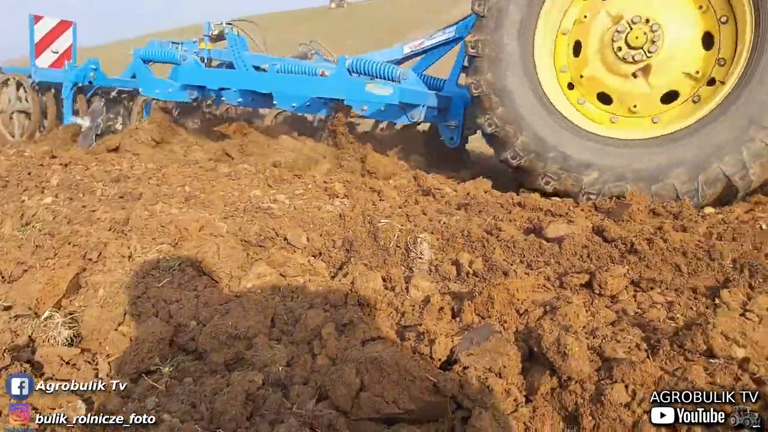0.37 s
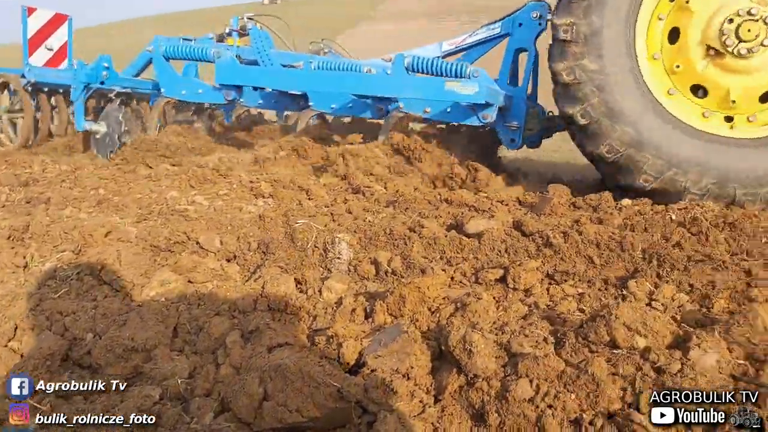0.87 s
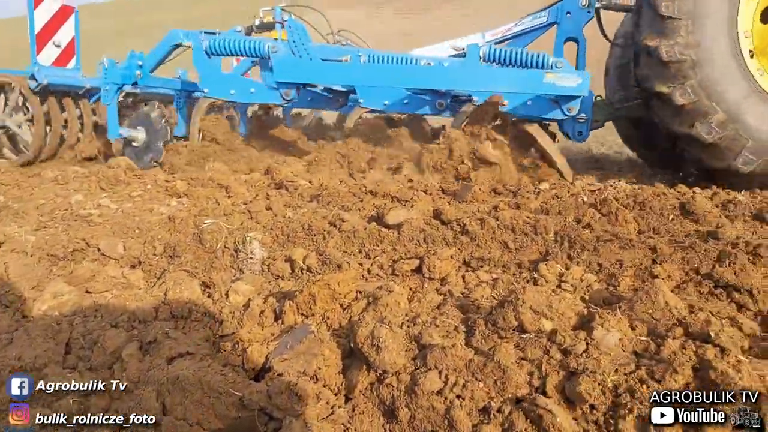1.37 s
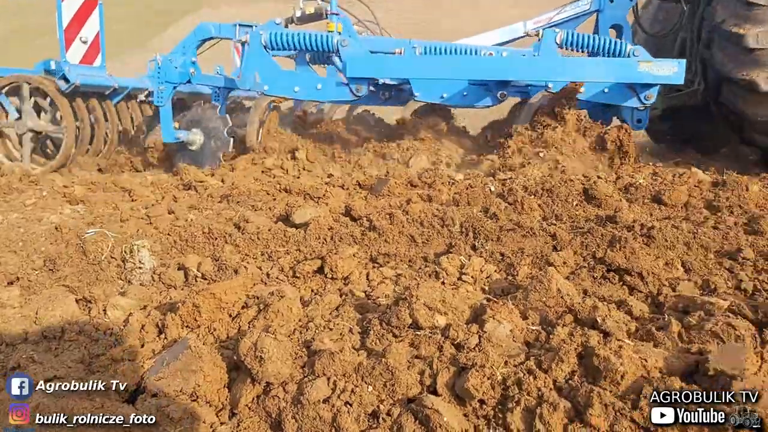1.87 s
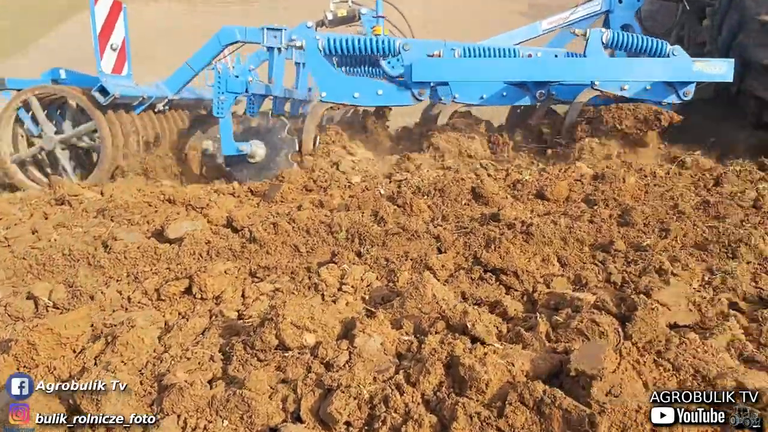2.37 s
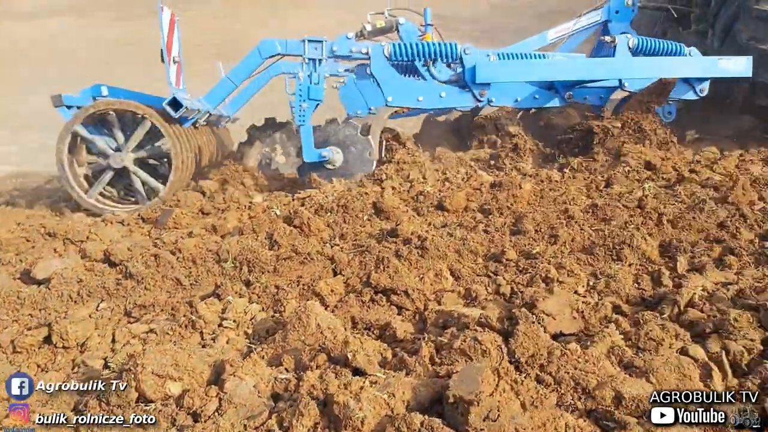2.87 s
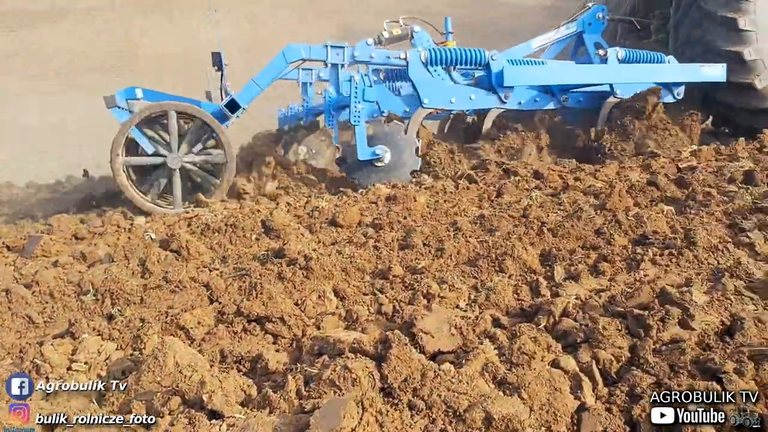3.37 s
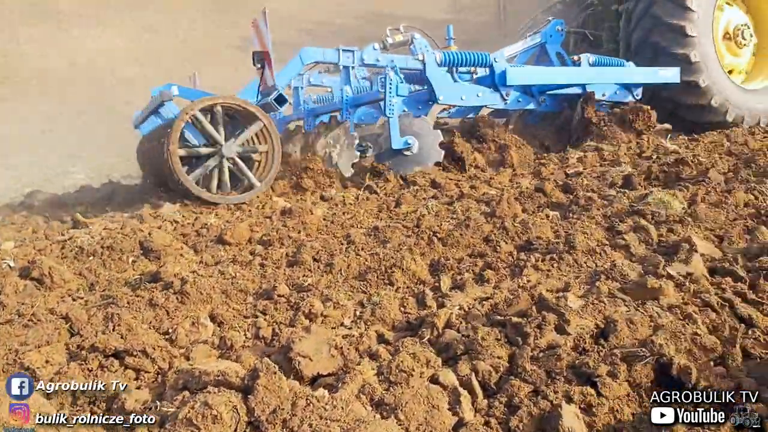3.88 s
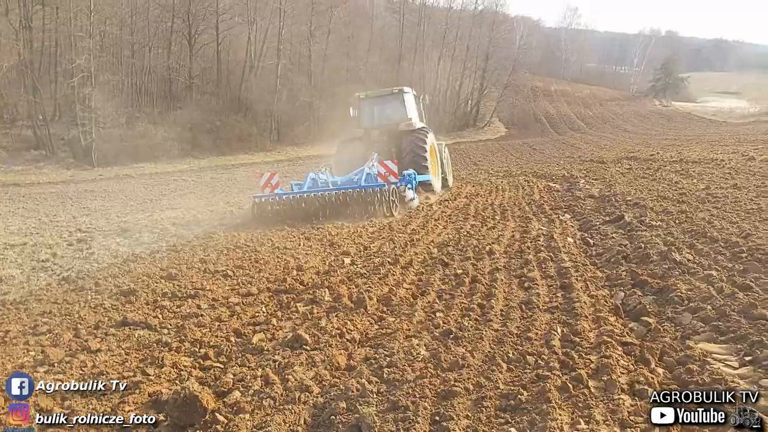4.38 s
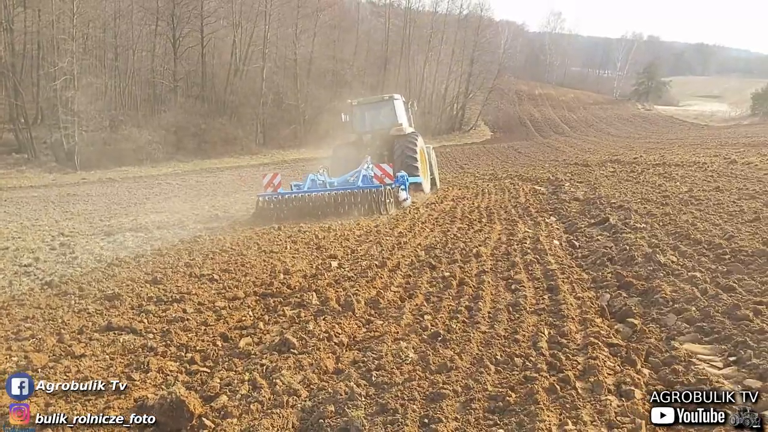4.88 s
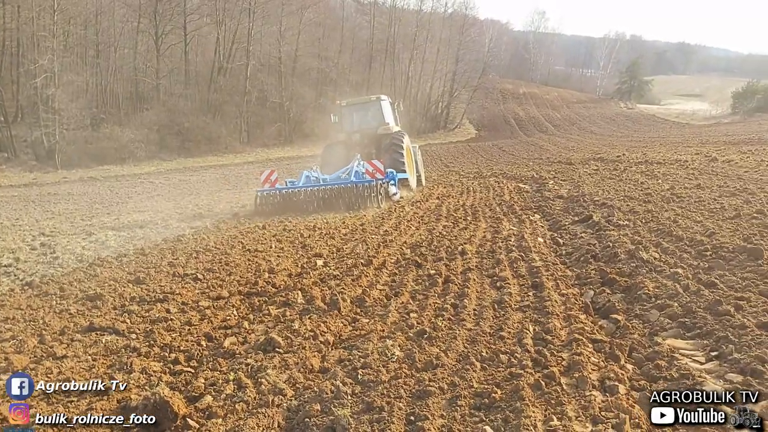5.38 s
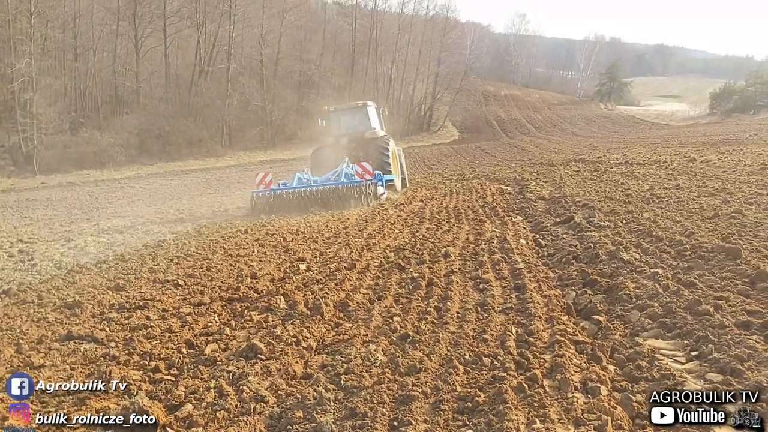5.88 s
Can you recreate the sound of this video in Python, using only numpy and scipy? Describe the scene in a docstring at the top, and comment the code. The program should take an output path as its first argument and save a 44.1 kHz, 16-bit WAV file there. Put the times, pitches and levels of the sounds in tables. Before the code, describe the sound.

A heavy diesel tractor drones close by, dragging tines through crumbling soil with stony clanks, then cuts briefly silent and continues quieter from behind.

```python
"""Tractor cultivating a field

A six-cylinder diesel tractor drags a tined cultivator past a two-port microphone on an open field, heard from close
beside the furrow, then, after a brief silence, from well behind. Exhaust orders and fan tones are phase-locked sines;
gear whine and intake whirr are sines modulated by noise; block, air and breaking soil are filtered noise.
Stones clank and loose parts rattle by exciting damped modes of the steel tines."""
import sys
import numpy as np
from scipy import signal
from scipy.fft import rfft, irfft, next_fast_len
from scipy.io import wavfile
from scipy.ndimage import uniform_filter1d, map_coordinates

SR = 44100
rng = np.random.default_rng(int(sys.argv[2]) if len(sys.argv) > 2 else 0)


def boost_factor(decibels):
    """Convert a level in decibels to a linear amplitude factor."""
    exponent = np.asarray(decibels, float) / 20
    return 10 ** exponent


def store_wav(level_fs):
    """Save 16-bit WAV to argv[1]."""
    pcm = np.round(np.clip(np.atleast_2d(level_fs), -1, 1) * 32767)
    wavfile.write(sys.argv[1], SR, pcm.T.astype(np.int16))


N = 264600
PAD = next_fast_len(N + 4096)
HZ = np.maximum(np.fft.rfftfreq(PAD, 1 / SR), 1)

# Stances count 0 beside, 1 passing, 2 leaving, 3 behind.
# tractor position: (time [s], stance [0-3])
STANCE = [(0, 0), (.4, 0), (1.8, 1), (2.4, 1), (3.6, 2), (4.15, 2), (4.3, 3), (6, 3)]
# the pass: (time [s], roar gain [dB], lag of the left port [ms])
PASS = [(0, 1, 0.36), (.6, 1, 0.38), (1.3, 2, 0.39), (1.9, 3, .4), (2.4, 1, 0.39), (2.9, 2, 0.37),
        (3.3, 1.5, .33), (4.15, 2.5, .27), (4.3, 1.5, 0.044), (5, 0.5, 0), (6, 0, 0)]
# silent gap: (start [s], end [s])
GAP_S = (4.1278, 4.3185)
# engine under load: (time [s], mean firing rate [Hz], mean rms level of the firing tone [dB])
ENGINE = [(0, 103.3, -17), (.3, 103, -15.5), (1.2, 102.5, -17), (1.7, 102.5, -18), (2.4, 101.6, -16.5),
          (2.9, 101.5, -18), (3.2, 100.1, -17.5), (4.15, 100.5, -18), (4.3, 103.1, -23.5),
          (4.9, 102.6, -24), (5.4, 103.9, -23.5), (5.7, 102.9, -23), (5.79, 102.9, -25),
          (5.9, 104.9, -23.5), (6, 100, -25)]
# exhaust overtones: (multiple of the firing rate, mean levels re firing tone at the four stances [dB])
OVERTONES = [(1.5, (-12.5, -12, -14, -12)), (2, (-23, -16, -14, -11))]
# belt-driven cooling fan: (multiple of the fan's turning rate, mean rms levels at the four stances [dB])
FAN = [(3, (-46.5, -37.5, -47.5, -36)), (4, (-39, -42, -35, -45.5)), (6, (-38.5, -38, -42.5, -46)),
       (9, (-41.5, -40.5, -43.5, -40))]
FAN_PER_FIRING = .715   # fan turns per firing
HALF_ORDER_DB = -48.5   # mean rms level at half the firing rate
HUM_LEFT_DB = -0.8      # exhaust and fan at the left port re the right
# gear whines: (multiple of the firing rate, nominal level [dB])
GEARS = [(19, -46), (38, -49), (51.5, -52)]
# intake whirr: (time [s], centre frequency [Hz], nominal level [dB])
WHIRR = [(0, 2200, -43), (.6, 2150, -38.5), (1.1, 2120, -35), (1.6, 2020, -36), (2.1, 2000, -36),
         (2.6, 2050, -45), (3.1, 2120, -49), (3.6, 2100, -56), (6, 2100, -60)]
# roar spectrum at each of four stances: (frequency [Hz], nominal density [dB per Hz])
ROAR = ([(25, -63.5), (35, -66), (55, -60.5), (80, -48), (130, -43), (200, -48.5), (400, -58.5), (800, -53),
        (1600, -58.5), (3200, -70), (6400, -69.5), (9500, -79)], [(25, -67.5), (35, -67), (55, -56),
        (100, -51.5), (200, -51.5), (400, -59.5), (800, -61), (1600, -56.5), (3200, -61.5), (6400, -80.5),
        (9500, -73.5)], [(25, -86), (35, -67), (55, -60), (100, -47.5), (200, -53), (400, -59),
        (800, -64.5), (1600, -64), (3200, -74), (6400, -80.5), (9500, -81.5)], [(25, -89), (35, -61),
        (55, -59), (100, -49), (200, -57), (400, -55.5), (800, -64.5), (1600, -66.5), (3200, -70),
        (6400, -76), (9500, -90)])
# peaks and dips from bodywork and ground echo at each stance: (frequency [Hz], width [Hz], gain [dB])
RIPPLE = ([(341, 63, 7.5), (1190, 210, -2.5), (1488, 59, 8), (2162, 220, 8), (2950, 520, 5.5),
          (3950, 590, 5.5), (4970, 420, 6), (6900, 280, -0.5), (7600, 490, 0), (8800, 220, 4.5)],
          [(780, 67, -0.5), (1270, 86, -9.5), (1692, 310, -9.5), (2575, 490, -9.5), (3280, 570, -12.5),
          (3620, 130, -8), (5140, 380, 4), (6320, 470, 9.5), (6900, 450, -3), (7560, 370, 4.5),
          (9140, 2100, -7)], [(1150, 270, -5.5), (1930, 270, -5), (2600, 140, 0.5), (3870, 54, 11),
          (4270, 700, -0.8), (5320, 350, 2.5), (5910, 630, 6), (6520, 390, 3.5)], [(372, 84, -8),
          (705, 350, 5), (2050, 130, -6), (2554, 140, -9.5), (2650, 200, 5.5), (3415, 120, -9),
          (3990, 330, -5.5), (6000, 230, 3.5), (6850, 810, -1)])
# left port re right, for sound from the side, turning and from ahead:
# (frequency [Hz], level [dB], likeness [0-1], phase lead [rad])
PORT_SIDE = [(60, -3.4, 0.96, 0.2), (300, -5.3, 0.98, 0.2), (520, -4.2, 0.97, 0.3), (1200, 1.1, 0.93, 0.3),
             (1500, -3.1, 0.9, 0.3), (1870, 0.8, 0.74, 0.1), (2300, -10.4, 0.45, 0.4),
             (2700, -3.8, 0.25, -0.6), (3200, -2.8, 0.31, -1.0), (4500, -2.0, 0.48, -0.0),
             (5500, -1.7, 0.44, -0.0), (6200, -8.3, 0.24, 0.3), (7400, 3.0, 0.68, 0.6),
             (8900, -14.3, 0.12, 1.0), (9500, -11.7, 0.25, 0.9)]
PORT_TURNING = [(60, -3.1, 0.96, 0.2), (300, -5.3, 0.99, 0.2), (700, -1.9, 0.97, 0.6),
                (1100, 3.2, 0.84, 0.5), (1450, -3.1, 0.91, 0.5), (1800, -2.6, 0.75, 0.9),
                (2150, -5.6, 0.35, 0.9), (3000, 0.3, 0.14, 1.0), (3750, -1.6, 0.18, 0.3),
                (4800, 4.5, 0.3, -0.1), (5500, -3.7, 0.61, -0.3), (5800, -9.6, 0.28, -0.1),
                (7300, 1.4, 0.54, 1.0), (8600, -15.7, 0.12, 1.0), (9500, -16.3, 0.35, 0.8)]
PORT_AHEAD = [(60, -4.0, 0.98, 0.1), (300, -6.6, 0.98, 0.0), (600, -1.9, 0.99, -0.0),
              (1200, -0.1, 0.95, -0.2), (1900, -5.8, 0.86, -0.4), (2350, -11.8, 0.4, -1.0),
              (2600, -5.7, 0.72, -0.3), (2850, -9.8, 0.75, 0.5), (3600, 1.3, 0.72, 0.5),
              (4200, 3.6, 0.79, -0.4), (4700, -3.2, 0.74, -0.9), (5900, -6.6, 0.78, 0.1),
              (6700, 0.2, 0.62, 0.4), (7600, -0.7, 0.55, 0.4), (8500, -5.3, 0.36, 0.5),
              (9500, -3.9, 0.23, -0.7)]
# stones on tines: (time [s], nominal strike level [dB], brightest frequency [Hz], scrape decay constant [ms])
CLANKS = [(0.052, -26, 5300, 5.1), (0.31, -20, 6000, 3), (.445, -17.5, 6460, 2.4), (1.368, -22, 5530, 3),
          (2.223, -21, 6400, 3), (2.789, -13, 7600, 3), (2.82, -18.5, 6540, 3.5), (2.869, -13, 4350, 5.8),
          (2.88, -20, 3730, 6.3), (2.927, -21, 6900, 5.8), (2.953, -23, 7500, 3.3), (3.039, -23.5, 7487, 5),
          (3.065, -23.5, 7770, 7.5), (3.267, -20, 3820, 8.3), (3.707, -29, 3950, 4.4),
          (4.823, -26, 3500, 3), (4.888, -22, 3400, 3.4), (4.899, -30, 3006, 2), (5.011, -10, 4310, 1.4),
          (5.380, -28, 4400, 3.3), (5.543, -23.5, 6746, 3.9)]
# modes of the tine steel: (frequency [Hz], relative level [dB], 60 dB decay time [s])
TINE = [(2150, -2, .03), (2850, -1, .09), (3440, -5, .022), (3850, -3, .022), (4420, 2, .024),
        (5200, -2, .02), (5950, -3, .022), (6600, -3, .018), (7700, -2, .015), (8850, -6, .012),
        (9300, -6, .012)]
RATTLES_PER_S, RATTLE_DB = 40, -50   # median rate; least strength


def in_time(rows):
    """Linear interpolation: columns of a curve at every sample."""
    s, *columns = np.transpose(rows)
    return [np.interp(np.arange(N) / SR, s, c) for c in columns]


def at_hz(rows):
    """Interpolation on a logarithmic frequency axis: columns of a spectrum at every bin."""
    hz, *columns = np.transpose(rows)
    return [np.interp(np.log(HZ), np.log(hz), c) for c in columns]


def at_stance(levels_db, stance):
    """Linear interpolation of levels between successive stances."""
    return np.interp(stance, np.arange(len(levels_db)), levels_db)


def drift(pole_hz):
    """Low-pass random process: noise through two equal poles, scaled to unit spread."""
    r = np.exp(-80 * np.pi * pole_hz / SR)   # computed at every 40th sample
    noise = rng.standard_normal(N // 40 + 2002)
    slow = signal.lfilter([1], [1, -2 * r, r * r], noise)[2000:]   # without the filter's run-in
    return np.interp(np.arange(N) / 40, np.arange(len(slow)), slow / slow.std())


def engine():
    """Phase is the integral of frequency: returns the wavering firing phase and the firing level in dB."""
    firing_hz, first_db = uniform_filter1d(in_time(ENGINE), size=1500)
    phase = 2 * np.pi * np.cumsum(firing_hz * (1 + .004 * drift(8.2))) / SR
    return phase, first_db


def exhaust(phase, first_db, stance):
    """Harmonic synthesis: the pulsed exhaust sounds at fixed multiples of the firing rate."""
    out = boost_factor(first_db + 0.66 * drift(28)) * np.cos(phase)
    for order, under_db in OVERTONES:   # crests meet in a pointed puff
        level_db = first_db + at_stance(under_db, stance)
        out += boost_factor(level_db + 2.5 * drift(4.2)) * np.cos(order * phase)
    out += boost_factor(HALF_ORDER_DB + 2.2 * drift(3.6)) * np.sin(phase / 2)   # uneven banks
    return np.sqrt(2) * out   # rms to peak


def fan(phase, stance):
    """Rotational tones: a belt locks the fan's orders to the firing, with some wander of phase."""
    out = np.zeros(N)
    for order, fan_db in FAN:
        level_db = at_stance(fan_db, stance) + 1.6 * drift(1.5)
        angle = order * FAN_PER_FIRING * phase + .6 * drift(6)
        out += boost_factor(level_db + 1.5 * drift(9)) * np.sin(angle)
    return np.sqrt(2) * out   # rms to peak


def gears(phase):
    """Amplitude modulation: fluttering tooth load smears the tooth-mesh tones into narrow bands."""
    return sum(boost_factor(db) * drift(25) * np.sin(order * phase) for order, db in GEARS)


def churn(phase, shared_db, own_db, throb):
    """Band-wise modulation: two flat noises flicker alike and their treble throbs with each firing; spectra."""
    white, out = rfft(rng.standard_normal((2, N)), PAD), 0
    together = drift(26) + 0.46 * drift(1.8)
    for octave in np.arange(4, 15):   # overlapping bands centred on 2 ** octave Hz
        window = np.clip(1 - abs(np.log2(HZ) - octave), 0, 1)
        band = irfft(white * window, PAD)[:, :N]
        treble = min(max(octave - 8, 0) / 4, 1)
        flicker = boost_factor(treble * shared_db * together + own_db * drift(26))
        out = out + flicker * (1 + throb * treble * np.cos(phase)) * band
    return rfft(out * np.sqrt(SR / 2), PAD)   # to about unit power per Hz


def whirr():
    """Modulation by noise: fast flutter of size and sign spreads a tone some 250 Hz wide, in uneven grains."""
    centre_hz, level_db = in_time(WHIRR)
    flutter = drift(140) * boost_factor(2.0 * drift(25))
    return boost_factor(level_db) * flutter * np.sin(2 * np.pi * np.cumsum(centre_hz) / SR)


def tines():
    """Modal synthesis: stones and rattling loose parts strike damped resonances of the tine steel."""
    out = np.zeros(N)
    chances_db = rng.normal(0, 1.5, (len(CLANKS), len(TINE)))
    loose = rng.random(N) < RATTLES_PER_S * boost_factor(4.0 * drift(5)) / SR
    sizes = boost_factor(RATTLE_DB + 3.5 * np.minimum(rng.exponential(1, N), 4))
    struck_mode = rng.integers(0, len(TINE) - 2, N)
    for k, (hz, mode_db, t60) in enumerate(TINE):
        force = loose * sizes * (abs(struck_mode - k) < 2) + 1e-18   # a rattle also excites adjoining modes
        for (s, strike_db, bright_hz, _), chance_db in zip(CLANKS, chances_db[:, k]):
            away_db = -13 * np.log2(hz / bright_hz) ** 2
            # the contact spreads through the steel: modes start up to 3.5 ms apart
            start = round((s + .0035 * rng.random()) * SR)
            force[start] += boost_factor(strike_db + away_db + chance_db - 8)
        r, w = boost_factor(-60 / (t60 * SR)), 2 * np.pi * hz / SR
        out += boost_factor(mode_db) * signal.lfilter([0, np.sin(w)], [1, -2 * r * np.cos(w), r * r], force)
    return out


def scrapes():
    """Friction noise: each stone cracks as it scrapes off, a decaying noise about its brightest pitch."""
    out, age = np.zeros(N), np.arange(800) / SR
    for s, strike_db, bright_hz, decay_ms in CLANKS:
        envelope = (1 - np.exp(-age / .002)) * np.exp(-age * 1000 / decay_ms)
        stroke = boost_factor(strike_db + 3) * rng.standard_normal(800) * envelope
        crack = signal.butter(2, [.5 * bright_hz, 1.2 * bright_hz], "band", fs=SR, output="sos")
        out[round(s * SR):][:800] += signal.sosfilt(crack, stroke)
    return out


def scene():
    """Superposition and delay: sources are coloured at each stance, faded together and lagged at the left port."""
    (stance,), (roar_db, lag_ms) = in_time(STANCE), in_time(PASS)
    lag = lag_ms * SR / 1000   # samples
    phase, first_db = engine()
    hum = exhaust(phase, first_db, stance) + fan(phase, stance)
    direct = rfft(gears(phase) + whirr() + tines() + scrapes(), PAD)
    roar, scattered = churn(phase, shared_db=.8, own_db=.7, throb=.06)
    out = np.zeros((2, N))
    for k, port in enumerate([PORT_SIDE, PORT_SIDE, PORT_TURNING, PORT_AHEAD]):
        ripple_db = sum(db * np.exp(-2 * ((HZ - hz) / width_hz) ** 2) for hz, width_hz, db in RIPPLE[k])
        colour = boost_factor(at_hz(ROAR[k])[0] + ripple_db)
        left_db, alike, lead = at_hz(port)
        alike, turn = np.clip(alike, 0, 1), np.exp(1j * np.clip(lead, -1, 1))
        # what is unlike reaches the left port round the housing and off the ground
        left_roar = boost_factor(left_db) * (turn * alike * roar + np.sqrt(1 - alike ** 2) * scattered)
        left_direct = boost_factor(left_db) * turn * direct
        heard = irfft(colour * np.array([left_roar, roar]), PAD)[:, :N] * boost_factor(roar_db)
        heard += irfft(np.array([left_direct, direct]), PAD)[:, :N]
        out += np.clip(1 - abs(stance - k), 0, 1) * heard
    out[0] = map_coordinates(out[0], [np.arange(N) - lag], order=3, mode="mirror")
    # long waves wrap round the housing and arrive closer together
    out[0] += boost_factor(HUM_LEFT_DB) * np.interp(np.arange(N) - 0.71 * lag, np.arange(N), hum)
    out[1] += hum
    return out


def top_cut(x):
    """Nothing passes above the cut-off."""
    return signal.sosfilt(signal.butter(12, 10710, fs=SR, output="sos"), x)


def record(dry):
    """Band limiting and gating: the microphone drops the deepest bass, a gap is silent, the top is cut off."""
    t = np.arange(N) / SR
    heard = signal.sosfilt(signal.butter(2, 42, "high", fs=SR, output="sos"), dry)
    fade_in = np.clip((t - GAP_S[1]) / 0.0013, 0, 1)
    gated = heard * ((t < GAP_S[0]) + fade_in)
    top = signal.ellip(14, .5, 80, 9560, fs=SR, output="sos")
    mix = signal.sosfilt(top, gated)
    return top_cut(mix)


dry = scene()
out = record(dry)
store_wav(out)
```